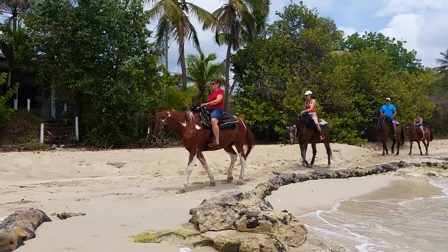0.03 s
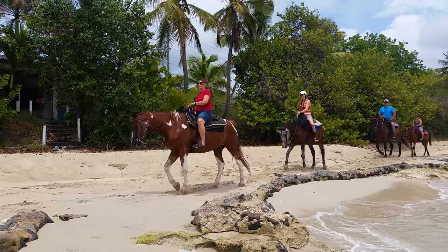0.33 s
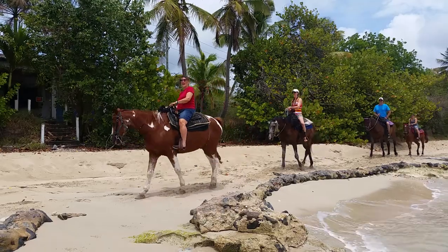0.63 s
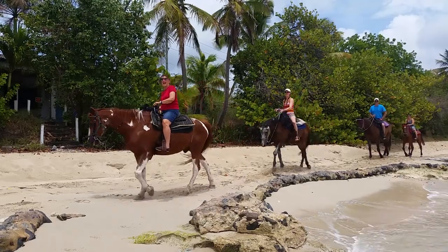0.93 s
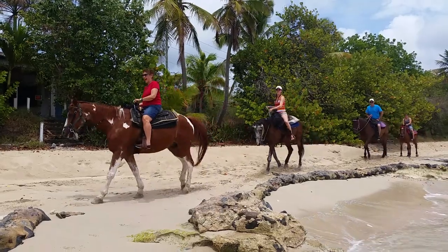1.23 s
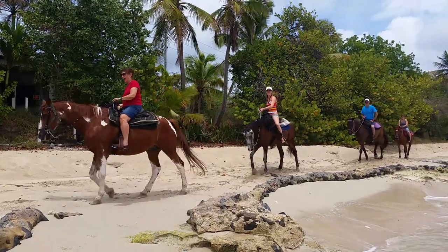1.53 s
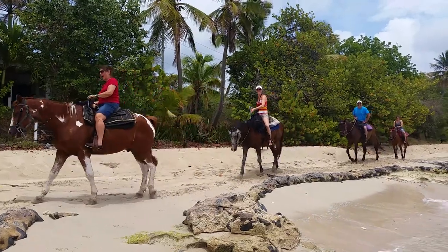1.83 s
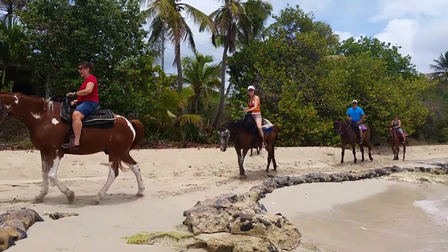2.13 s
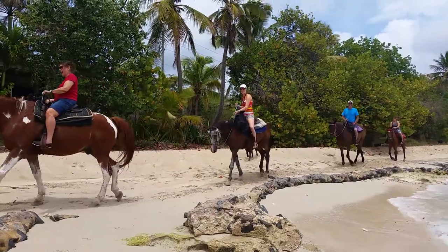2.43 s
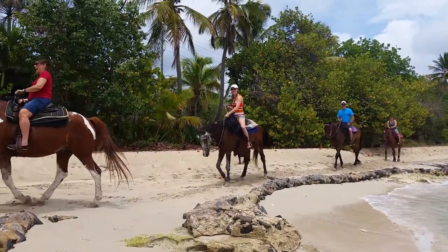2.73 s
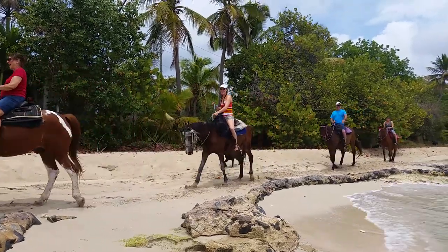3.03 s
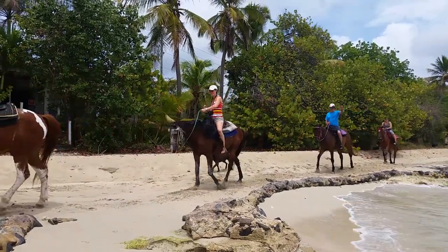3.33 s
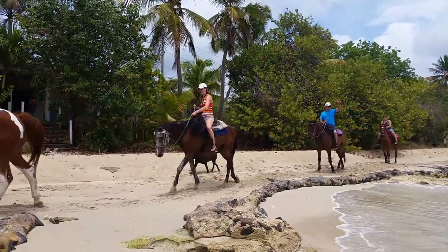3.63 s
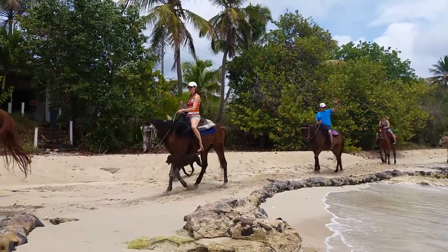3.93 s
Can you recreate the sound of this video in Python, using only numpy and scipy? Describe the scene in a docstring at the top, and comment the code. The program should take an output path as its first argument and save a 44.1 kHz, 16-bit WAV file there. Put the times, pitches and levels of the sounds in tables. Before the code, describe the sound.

A small wave washes onto a sandy beach, fading in at about 0.4 seconds after silence. The water builds with little splashes, and a faint, distant bird peeps once near 1.5 seconds. The wave breaks with gurgles around 2.2 to 2.6 seconds, surges again just after 3, then drains away fizzing by 4. Gusts of wind rumble and thump on the microphone throughout, shifting between left and right.

```python
"""A sandy beach: a small wave runs up, breaks in two surges and drains away, splashing and fizzing.
The water is churning noise, clicking droplets and bubbles that ring briefly as they rise in pitch.
Gusts rumble and thump on a microphone's two openings (ports, left and right), each in its own way.
A far bird peeps once. The sound fades in after a short silence."""
import sys
import numpy as np
from scipy import signal
from scipy.fft import rfft, irfft
from scipy.io import wavfile
from scipy.ndimage import uniform_filter1d

SR = 44100
rng = np.random.default_rng(int(sys.argv[2]) if len(sys.argv) > 2 else 0)


def unload_audio(sound):
    """Save the sound as a 16-bit wav file, at the path given as the first command line argument."""
    columns = np.transpose(np.atleast_2d(sound))
    # keep every value between -1 and 1, then stretch to whole-number steps
    steps = np.round(np.clip(columns, -1, 1) * 32767)
    wavfile.write(sys.argv[1], SR, steps.astype(np.int16))


N = 176400
TIME = np.arange(N) / SR
FREQS = np.fft.rfftfreq(N, 1 / SR)
PORT_DELAY_S = 0.00033  # sound from one side reaches the far port about this much later
TOP_HZ = 15900


def amp(db):
    """Turns decibels into a number to multiply by."""
    return 10 ** (np.asarray(db) / 20)


def unit_level(x):
    """Scales a signal to an average (rms) level of 1."""
    return x / np.sqrt(np.mean(x ** 2) + 1e-20)


def over_pitch(points):
    """Joins (pitch_hz, value) points into a curve over all frequencies."""
    hz, value = np.transpose(points)
    return np.interp(np.log(FREQS + 1), np.log(hz + 1), value)


def over_time(table, column=1):
    """Joins a table's decibel levels into a volume curve over time."""
    rows = np.array(table)
    return amp(np.interp(TIME, rows[:, 0], rows[:, column]))


def band(x, low_hz, high_hz):
    """Keeps the part of a sound between two frequencies, with soft edges."""
    hz = FREQS + 1
    return irfft(rfft(x) / np.sqrt((1 + (low_hz / hz) ** 8) * (1 + (hz / high_hz) ** 8)), N)


def wobble(seconds):
    """A smooth random curve that changes in about the given time."""
    return unit_level(irfft(rfft(rng.standard_normal(N)) * np.exp(-(FREQS * seconds) ** 2), N))


def shaped_noise(tone):
    """Noise whose tone follows (pitch_hz, level_db) points."""
    return unit_level(irfft(rfft(rng.standard_normal(N)) * amp(over_pitch(tone)), N))


def add(mix, start_s, sound):
    """Mixes a sound in at the given time."""
    part = mix[max(round(start_s * SR), 0):][:len(sound)]
    part += sound[:len(part)]


def wind():
    """Wind rumbles unevenly on each port, and swirls of air strike it with short thumps."""
    # Wind strength at each port: time_s, level_db
    left_strength = [(.42, -25.5), (.55, -35), (.62, -28.5), (.8, -26), (.9, -41), (1.05, -26), (1.28, -24),
                     (1.6, -27), (1.8, -31), (2.05, -27.5), (2.2, -43), (2.34, -38), (2.52, -24.5),
                     (2.8, -32), (2.95, -31.5), (3.15, -22), (3.37, -33), (3.55, -23.5), (3.72, -28),
                     (3.9, -32), (4, -27)]
    right_strength = [(.42, -37.5), (.66, -30), (1.05, -33.5), (1.22, -23), (1.5, -26.5), (1.7, -23),
                      (1.77, -33.5), (1.98, -37), (2.3, -41), (2.52, -36), (2.66, -24), (3.15, -21.5),
                      (3.31, -29.5), (3.39, -22.5), (3.45, -18), (3.72, -18.5), (3.8, -22), (3.9, -29.5),
                      (4, -18.5)]
    # Swirls striking one port: peak_s, port (0 left, 1 right), level_db
    swirls = [(.63, 0, -27), (0.856, 0, -14), (0.949, 0, -20), (.975, 1, -20), (1.206, 1, -17.5),
              (1.273, 1, -13.5), (1.35, 1, -14), (1.422, 1, -18), (1.535, 1, -25), (2.12, 0, -22.5),
              (2.475, 0, -23.5), (2.555, 0, -32), (2.683, 0, -21), (2.685, 1, -19), (2.755, 1, -27),
              (2.85, 0, -18.5), (3.165, 1, -17.5), (3.254, 0, -16), (3.36, 1, -18), (3.46, 1, -12),
              (3.54, 1, -22.5), (3.624, 1, -19), (3.725, 0, -14), (3.735, 1, -18), (3.809, 0, -20.5)]
    # Tone of the rumble and of the fuller thumps: pitch_hz, level_db
    rumble_tone = [(10, -34), (30, -4.5), (60, 0), (100, 1.5), (150, -3.5), (220, -11), (320, -15.5),
                   (480, -21.5), (900, -46), (2500, -69), (9000, -90)]
    thump_tone = [(10, -22), (40, -3), (80, 4), (130, 2), (210, 0), (300, -11), (480, -21.5), (900, -37),
                  (4000, -73)]
    swirl_s, lump_db = 0.012, 2.0
    ports = []
    for port, strength in enumerate((left_strength, right_strength)):
        push = over_time(strength) * unit_level(amp(lump_db * wobble(0.025)))
        hits = sum(amp(db) * np.exp(-((TIME - peak_s) / swirl_s) ** 2 / 2)
                   for peak_s, side, db in swirls if side == port)
        thump = shaped_noise(thump_tone)
        thump /= np.sqrt(uniform_filter1d(thump ** 2, size=1100) + 1e-6)  # steady, so every hit lands
        ports.append(push * shaped_noise(rumble_tone) + hits * thump)
    return np.array(ports)


def bird():
    """A far bird gives one thin, falling peep with a slight quiver."""
    start_s, length_s, first_hz, last_hz = 1.528, 0.07, 6520, 6120
    progress = np.clip((TIME - start_s) / length_s, 0, 1)
    hz = (first_hz + (last_hz - first_hz) * progress) * (1 + 0.012 * wobble(0.003))
    swell = np.sqrt(abs(np.sin(np.pi * progress)))
    return amp(-32) * swell * np.sin(2 * np.pi * np.cumsum(hz) / SR)


def churn():
    """Churning water: noise that swells in short patches and is smoother in the treble."""
    # How alike the two ports sound: pitch_hz, likeness (0 to 1)
    likeness = [(200, 1), (800, 0.95), (1150, 0.73), (1650, 0.26), (2400, 0), (4000, 0.02)]
    patch_db, patch_s, patch_hz, smooth_above_hz = 1.7, 0.022, 500, 4550
    frame, hop = 256, 64
    # Cut the noise into a grid of pitch and time.
    hz, _, grid = signal.stft(rng.standard_normal((2, N)), SR, nperseg=frame, noverlap=frame - hop)
    # Blurring random numbers along both directions makes the patches.
    time_blur = (np.fft.fftfreq(grid.shape[2], hop / SR) * patch_s) ** 2
    pitch_blur = (np.fft.fftfreq(grid.shape[1], SR / frame)[:, None] * patch_hz) ** 2
    speckles = np.fft.fft2(rng.standard_normal(grid.shape[1:]))
    patches = unit_level(np.fft.ifft2(speckles * np.exp(-time_blur - pitch_blur)).real)
    depth_db = patch_db / np.hypot(1, hz[:, None] / smooth_above_hz)
    grid *= amp(depth_db * patches)
    left, other = rfft(signal.istft(grid, nperseg=frame, noverlap=frame - hop)[1][:, :N])
    same = over_pitch(likeness)
    right = same * left + np.sqrt(1 - same ** 2) * other
    return unit_level(irfft(np.array([left, right]), N))


def spray():
    """Droplets click from all sides, so each reaches the two ports a moment apart."""
    drops_per_s = 1500
    at = np.flatnonzero(rng.random(N) < drops_per_s / SR)
    size = np.minimum(rng.exponential(1, N), 5)[at]
    lag = (rng.uniform(-1.17, 1, N)[at] * PORT_DELAY_S * SR).astype(int)
    clicks = np.zeros((2, N))
    clicks[0, at] = clicks[1, (at + lag) % N] = amp(-16.5 + 5 * size)
    return clicks


def patter():
    """Little clusters of drops land, each a tiny puff of high noise."""
    clusters_per_s, decay_s = 32, 0.00083
    lands = rng.random(N) < clusters_per_s / SR
    size = np.minimum(rng.exponential(1, N), 3)
    kicks = lands * amp(-7.5 + 5 * size) ** 2
    power = signal.lfilter([1], [1, -np.exp(-1 / (decay_s * SR))], kicks)  # each kick dies away
    return band(np.sqrt(power) * rng.standard_normal((2, N)), 3200, TOP_HZ)


def bubble(hz, cycles):
    """One bubble rings, fading to about a third in the given cycles while its pitch creeps up."""
    age = np.arange(0, 5, hz / cycles / SR)  # counted in decay times
    loudness = (1 - np.exp(-age * cycles)) * np.exp(-age)
    return loudness * np.sin(2 * np.pi * cycles * age * (1 + 0.023 * age))


def bubbles():
    """Bubbles of all sizes ring at random, a few of them loudly."""
    bubbles_per_s, low_hz, high_hz = 260, 444.2, 4530
    rings = np.zeros((2, N))
    for when, pitch, softness, side in rng.random((int(bubbles_per_s * N / SR), 4)):
        hz = low_hz * (high_hz / low_hz) ** pitch
        gain = amp(-5 - 3 * np.log(softness + 0.023)) * np.sqrt(hz / high_hz)
        ring = gain * bubble(hz, cycles=3.55)
        start_s = when * N / SR
        add(rings[0], start_s, ring)
        add(rings[1], start_s + (2 * side - 1) * PORT_DELAY_S, ring)
    return rings


def gulps():
    """Large bubbles and air pockets ring out above the wash."""
    # Ringing air pockets: start_s, pitch_hz, level_db
    pockets = [(.674, 1880, -26), (.921, 780, -27.5), (2.198, 1220, -15), (2.211, 716, -21),
               (2.237, 2490, -14), (2.26, 373, -22.5), (2.351, 203, -28), (2.461, 315, -22),
               (2.568, 930, -17), (3.738, 1400, -22.5)]
    rings = np.zeros(N)
    for start_s, hz, db in pockets:
        add(rings, start_s, amp(db) * bubble(hz, cycles=4.6))
    return rings


def splashes():
    """Single splashes stand out, each a quickly dying burst of noise around one pitch."""
    # Slaps of water: start_s, level_db, decay_s, pitch_hz
    slaps = [(.479, -17.5, 0.0046, 3530), (0.623, -24.5, .018, 3900), (0.691, -27, 0.033, 3020),
             (1.069, -21, 0.0082, 4200), (1.433, -16, 0.0044, 4750), (1.494, -16, .008, 2550),
             (1.513, -13, .005, 2250), (1.560, -6.5, 0.0036, 3870), (1.698, -14, 0.0097, 2400),
             (1.738, -11, 0.0055, 2250), (1.851, -13, .009, 6500), (2.200, -13, .012, 1100),
             (2.404, -10, 0.0046, 3800), (2.481, -13, .007, 6400), (2.513, -13, 0.012, 2720),
             (2.536, -7, 0.021, 1300), (3.127, -12, 0.011, 2400), (3.573, -21, .006, 5000)]
    ports = np.zeros((2, N))
    age = np.arange(SR // 8) / SR
    for start_s, db, decay_s, hz in slaps:
        tone = signal.butter(2, [hz / 1.25, hz * 1.25], "bandpass", fs=SR, output="sos")
        for port in ports:
            burst = np.exp(-age / decay_s) * rng.standard_normal(len(age))
            add(port, start_s, amp(db) * signal.sosfilt(tone, burst))
    return ports


def ticks():
    """Spray makes a few thin ticks: sudden, very short puffs of high noise."""
    # Ticks of spray: start_s, level_db
    drops = [(1.413, -15), (1.519, -15), (1.683, -16), (1.743, -17), (1.785, -15), (2.083, -17),
             (2.722, -5)]
    decay_s = 0.0016
    puffs = np.zeros((2, N))
    for start_s, db in drops:
        age = np.maximum(TIME - start_s, 0)
        loudness = amp(db) * (age > 0) * np.exp(-np.minimum(age / decay_s, 20))
        puffs += loudness * rng.standard_normal((2, N))
    return band(puffs, 8000, TOP_HZ)


def surf():
    """Churning water, drops and bubbles swell and ebb with the wave."""
    # The water's roar, hiss and fizz: low_hz, high_hz, gain_db
    bands = [(188, 1253, 9.5), (1426, 4230, 6), (5000, 20000, 16.5)]
    # The wave running up, then breaking and draining: time_s, roar_db, hiss_db, fizz_db
    run_up = [(0.65, -41, -42, -53.5), (0.688, -38.5, -37, -50.5), (0.79, -39, -39.5, -50),
              (1.14, -39, -37.5, -50.5), (1.684, -34.5, -30.5, -43), (1.72, -33.5, -29.5, -44.5)]
    break_and_drain = [(1.85, -35, -30, -41), (1.94, -30, -28.5, -40.5), (2.18, -32.5, -28.5, -42),
                       (2.21, -24.5, -28.5, -39.5), (2.23, -29, -27, -40.5), (2.5, -29.5, -23, -39),
                       (2.51, -26.5, -23.5, -35.5), (2.7, -28.5, -25, -38.5), (2.98, -32, -27, -39),
                       (3.14, -26, -24, -34.5), (3.29, -29.5, -25, -36), (3.55, -40, -30.5, -46.5),
                       (3.96, -39.5, -38.5, -48)]
    wave = np.vstack([run_up, break_and_drain])
    flicker_db, flicker_s = 0.78, 0.0098
    wash = (churn() + spray()) * amp(flicker_db * wobble(flicker_s))
    water = wash + bubbles() + patter()
    return sum(band(water, low_hz, high_hz) * amp(db) * over_time(wave, column)
               for column, (low_hz, high_hz, db) in enumerate(bands, start=1))


def scene():
    """The beach as each port hears it, plus the wind on the ports."""
    # How each port colours the beach's sound: pitch_hz, gain_db
    left_tone = [(200, 3), (330, 3), (520, 0), (900, 2.5), (1400, -3.5), (2400, -1.5), (4000, -7.5),
                 (5200, -7.5), (5900, -4.5), (6600, 0), (7400, -7), (8300, -13), (10500, -12.5),
                 (15000, -14.5)]
    right_tone = [(200, 7), (330, 6), (550, 2.5), (900, 5), (1250, 2), (1900, 8.5), (2450, 12.5), (3100, 4),
                  (4000, -0.5), (5200, -10.5), (6300, -17.5), (9500, -21.5), (11000, -17.5), (15000, -18.5)]
    port_gains = amp([over_pitch(left_tone), over_pitch(right_tone)])
    gusts = wind()
    beach = gulps() + splashes() + ticks() + bird() + surf()
    return gusts + irfft(rfft(beach) * port_gains, N)


def record(dry):
    """Fades the sound in after a short silence and cuts the highest treble."""
    silence_s, fade_s, first_gain = 0.417, 0.23, 0.045
    progress = np.clip((TIME - silence_s) / fade_s, 0, 1)
    fade = (TIME > silence_s) * (first_gain + (1 - first_gain) * progress ** 1.07)
    treble_cut = signal.firwin(1023, TOP_HZ, window=("kaiser", 9), fs=SR)
    return signal.oaconvolve(dry * fade, treble_cut[None], "same")


dry = scene()
out = record(dry)
unload_audio(out)
```